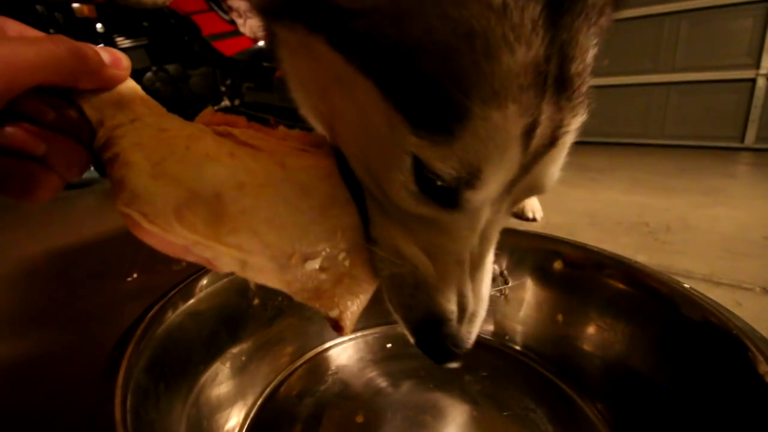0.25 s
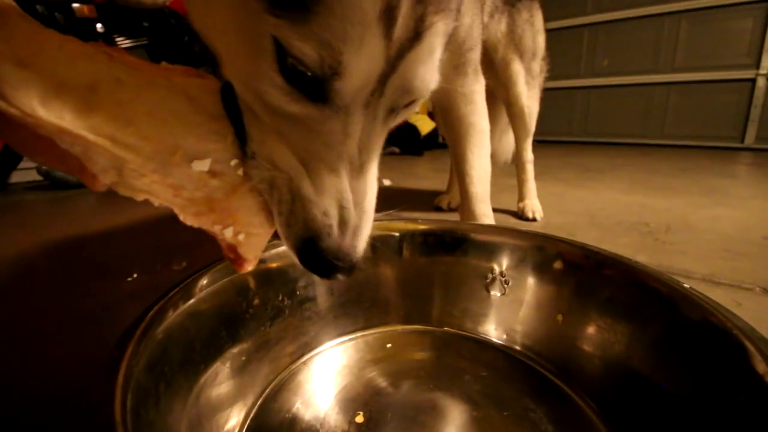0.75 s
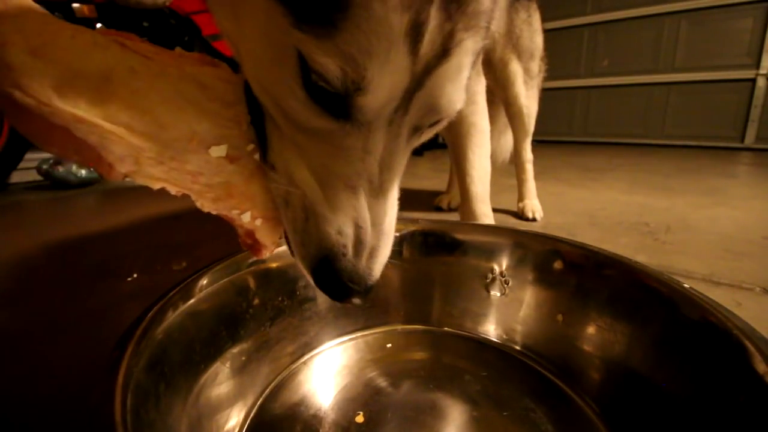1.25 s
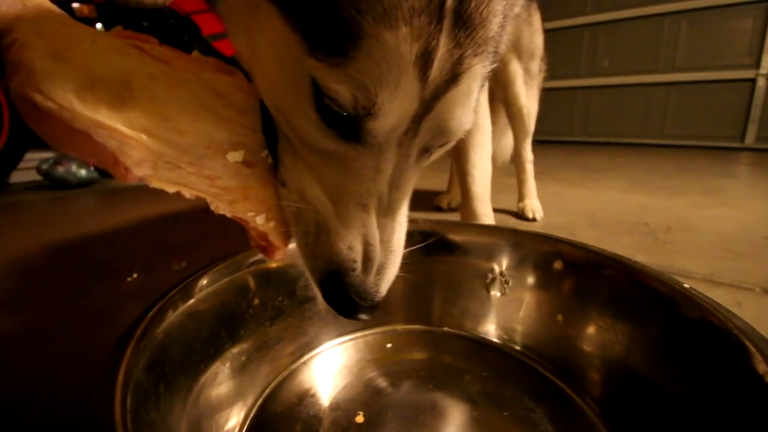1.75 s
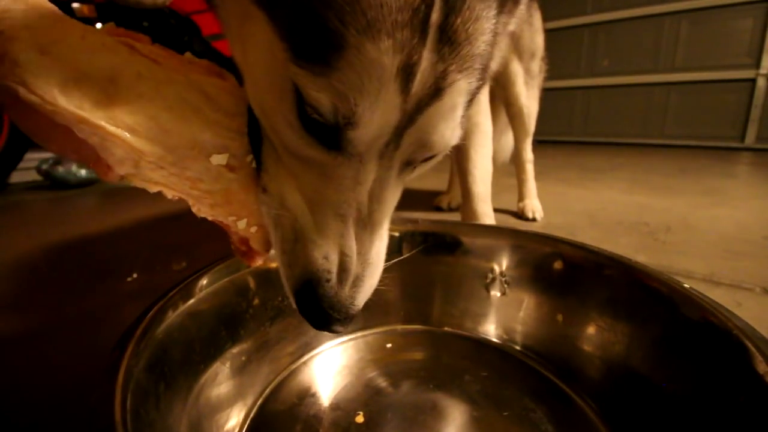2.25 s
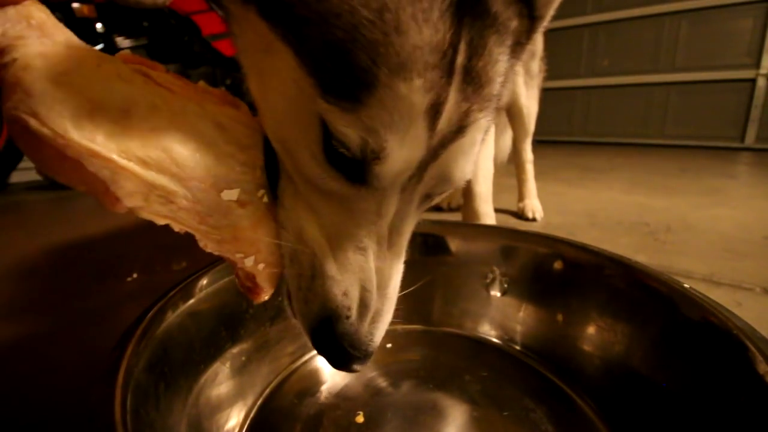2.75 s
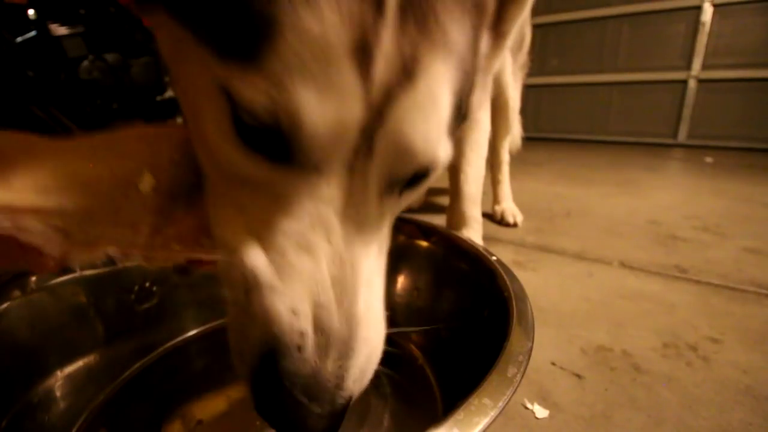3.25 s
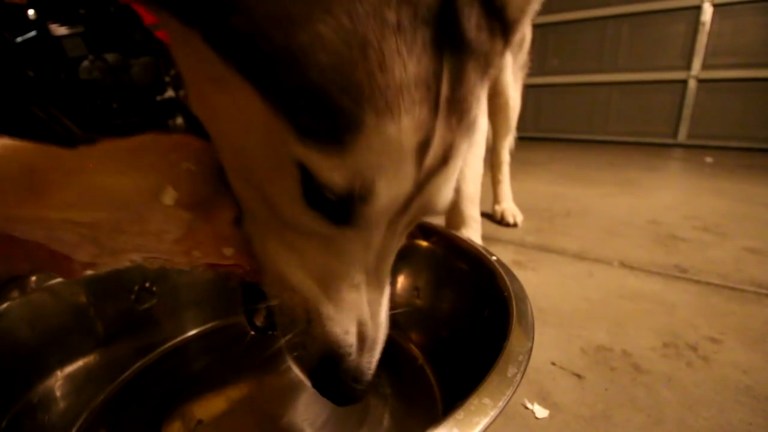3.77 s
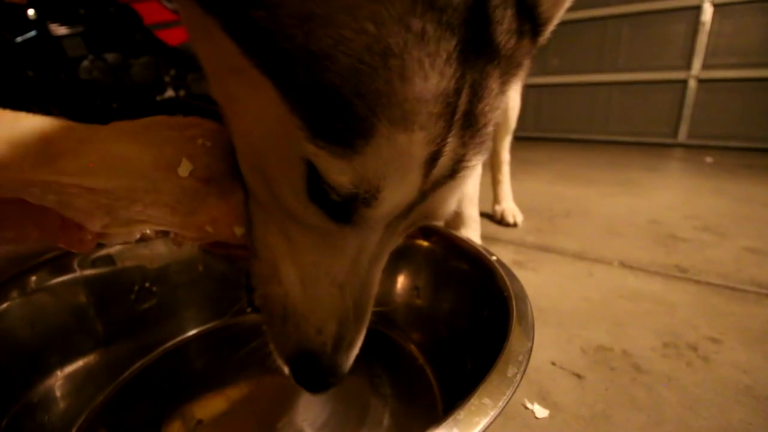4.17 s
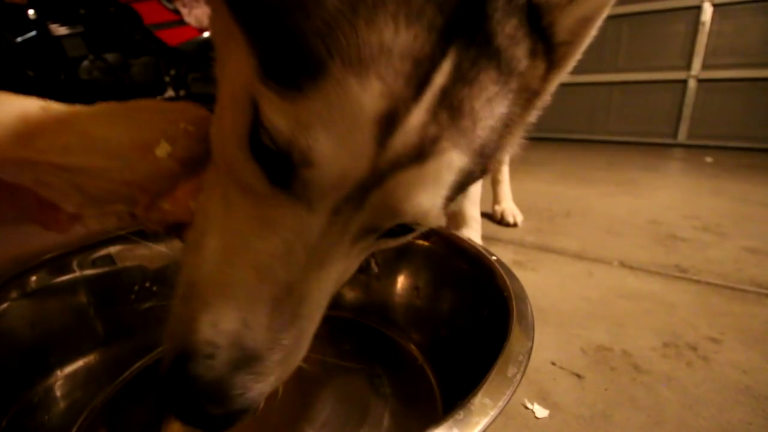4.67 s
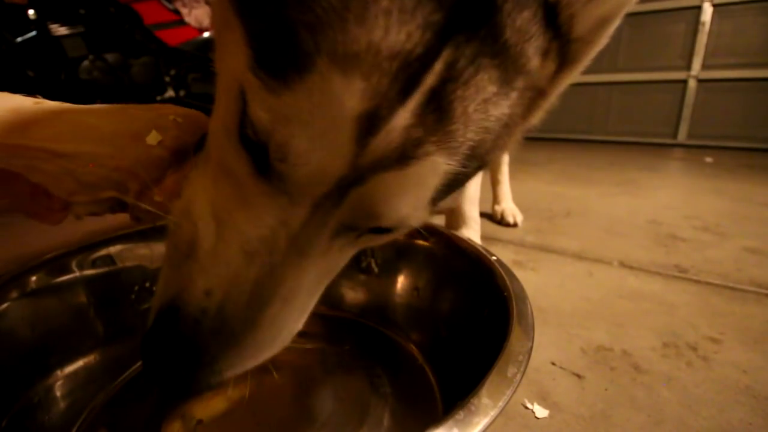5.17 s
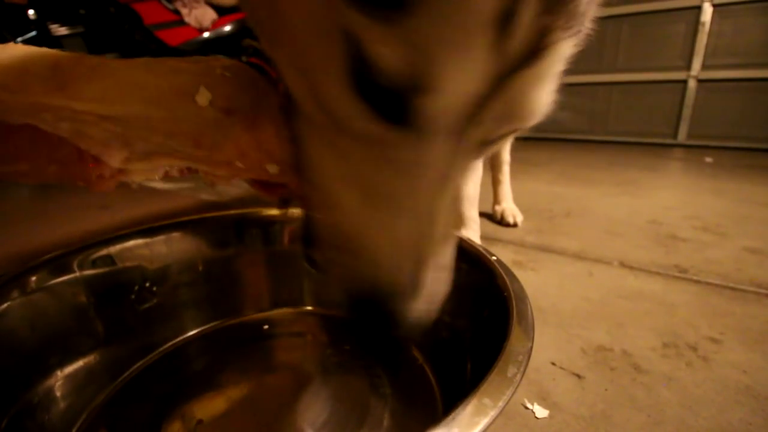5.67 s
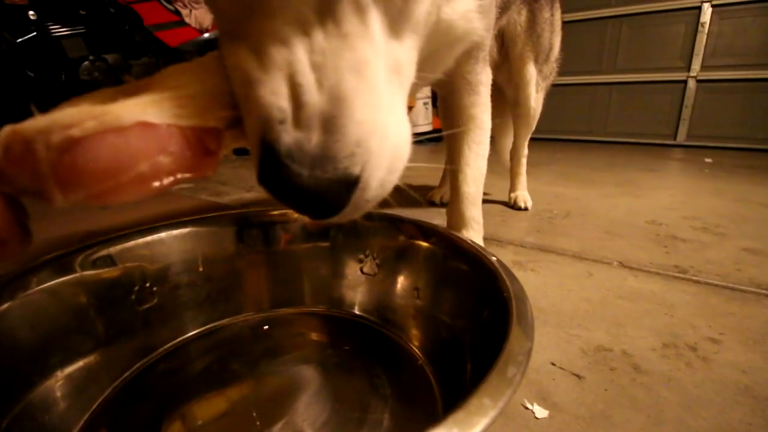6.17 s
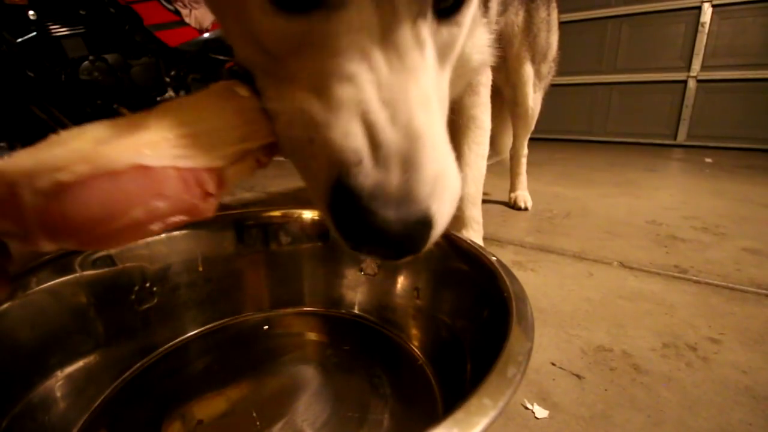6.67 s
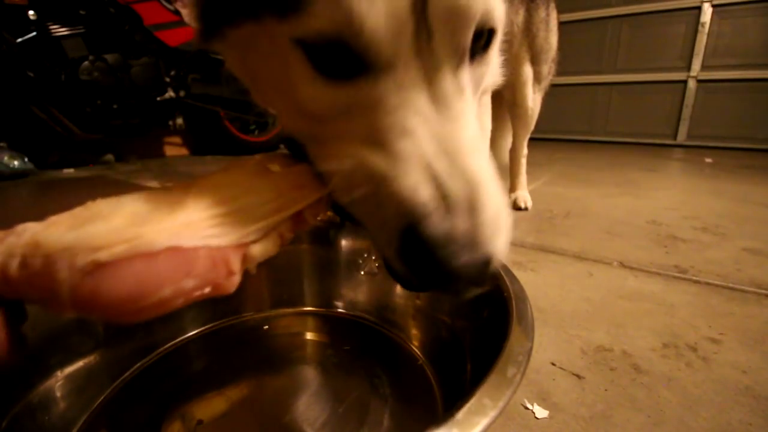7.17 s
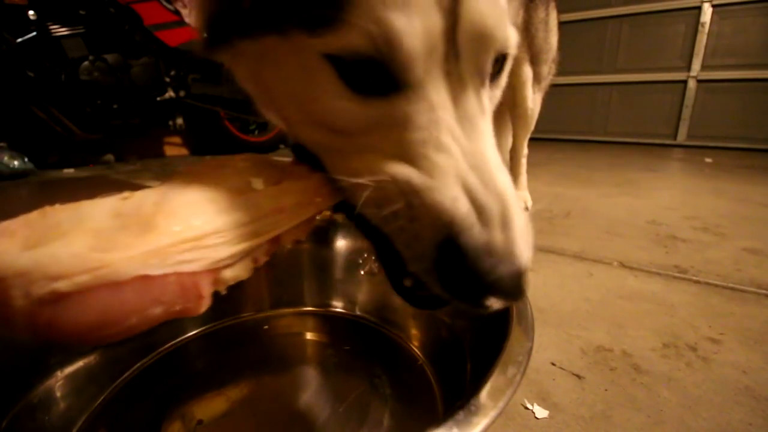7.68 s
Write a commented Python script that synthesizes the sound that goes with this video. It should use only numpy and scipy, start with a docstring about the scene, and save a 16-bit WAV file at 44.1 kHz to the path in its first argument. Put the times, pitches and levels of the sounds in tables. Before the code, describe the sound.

A dog works at raw meat right beside the microphone: sticky squelches, sharp lip smacks, suction pops and low jaw thuds with short meaty cracks, around three irregular chews a second. Early on there are gliding licks. A steel bowl rings very faintly beneath. From three seconds a deep handling rumble joins in, while the quiet garage adds only a thin, dull tail.

```python
"""In a quiet garage, a dog licks and chews raw meat over a wide steel bowl, close to a camera.
Saliva films tear in runs of clicks that ring the mouth as smacks, squelches and suction pops.
Jaws thud and the meat cracks; long licks ring the hollow under the tongue with a gliding pitch.
Decaying modes give the steel and the air in the bowl, fading noise gives the walls' answer,
and filtered noise makes the still air and the rumble of the hand on the camera."""
import sys
import numpy as np
from scipy import signal
from scipy.fft import rfft, irfft
from scipy.io import wavfile
from scipy.ndimage import uniform_filter1d

SR = 44100
rng = np.random.default_rng(int(sys.argv[2]) if len(sys.argv) > 2 else 0)


def transcribe(u):
    """Save the signal u as a 16-bit wav file named by the first command-line argument.

    u: samples, shape (n,) or (channels, n), limited to [-1, 1]; the rate is SR.
    q: integer samples, one column per channel.
    """
    v = np.clip(np.atleast_2d(u).T, -1, 1)
    q = np.round(v * 32767).astype(np.int16)
    wavfile.write(sys.argv[1], SR, q)


N = 349713
TIME = np.arange(N) / SR  # seconds

# colour of wet crackle over the bowl: (frequency [Hz], relative level [dB])
WET = [(90, -9.5), (380, -0.5), (580, -10), (830, -3), (1220, -2.5), (1650, 0), (3800, 4), (4700, -1),
       (5600, 2.5), (7200, -4), (15000, -15.5)]
# colour of the still garage air, shared by the low side noise: (frequency [Hz], relative level [dB])
LOW_COLOUR = [(25, -6), (350, 1), (1200, -15), (3500, -14), (15000, -12.5)]


def undb(db):
    """Decibels to gain."""
    return 10 ** (np.asarray(db) / 20)


def unit(x):
    """Scale to rms 1."""
    return x / np.sqrt(np.mean(x ** 2))


def blow(x, db):
    """Give a short sound the energy of 10 ms at this level."""
    return x * undb(db) * np.sqrt(SR / 100 / np.sum(x ** 2))


def follow(curve):
    """Gain over time from (time [s], level [dB]) rows."""
    return undb(np.interp(TIME, *np.transpose(curve)))


def add(track, s, x):
    """Mix a short sound in at time s."""
    i = int(np.clip(s * SR, 0, N - 1))
    track[i:i + len(x)] += x[:N - i]


def band(x, lo_hz, hi_hz, order=2):
    """Causal band-pass."""
    edges = [lo_hz, min(hi_hz, SR / 2 - 1)]
    return signal.sosfilt(signal.butter(order, edges, "band", fs=SR, output="sos"), x)


def colour(x, points, size=1024):
    """Causal filter with a (frequency [Hz], level [dB]) spectrum, built from the cepstrum."""
    hz, db = np.transpose(points)
    bins = np.maximum(np.arange(size + 1), .5) * SR / (2 * size)
    gain = undb(np.interp(np.log(bins), np.log(hz), db))
    cepstrum = irfft(np.log(gain))[:size]
    cepstrum[1:] *= 2  # folding the cepstrum makes the filter minimum-phase
    response = irfft(np.exp(rfft(cepstrum, 2 * size)))[:size]
    return signal.fftconvolve(x, response)[:len(x)]


def ring(x, hz, t60):
    """One decaying mode driven by x; its pitch may move."""
    turn = np.exp(2j * np.pi * np.cumsum(hz * np.ones(len(x))) / SR)
    decay = np.exp(-np.log(1000) / t60 / SR)
    return (turn * signal.lfilter([1], [1, -decay], x / turn)).imag


def snaps(length, rate, spread_db):
    """Random clicks at a mean rate per second: many small, a few large."""
    hits = rng.random(length) < rate / SR
    sign = rng.choice([-1, 1], length)
    force = undb(spread_db * np.minimum(rng.exponential(size=length), 4))
    return hits * sign * force


def even(x, span_s):
    """Hold the slow level at 1 and keep the quick grain."""
    power = uniform_filter1d(x ** 2, int(span_s * SR))
    return x / np.sqrt(np.maximum(power, 0) + 1e-12)


def tear(ms, first_snap, size):
    """A saliva film parts in snaps that swell and die away; shorter films get a stronger first snap."""
    age = TIME[:size] * 1000 / max(ms, .5)  # in tear lengths
    envelope = np.exp(-age ** 2 / 2) * np.minimum(.45 + 1.5 * age, 1)
    burst = blow(snaps(size, 7000, 2.2) * envelope + 1e-12, 0)
    burst[0] += first_snap * np.linalg.norm(burst) * np.exp(-ms / 2)
    return burst


def pockets(burst, t60, high_hz, count, low_hz=900):
    """Gaps between lips, teeth and meat ring at pitches that are new every time."""
    pitches = low_hz * (high_hz / low_hz) ** rng.random(count)
    return sum(ring(burst, hz, t60) for hz in pitches)


def garage_air():
    """The still air is steady noise, strongest in the lows."""
    return undb(-59.5) * unit(colour(rng.standard_normal(N), LOW_COLOUR))


def side_noise():
    """A faint hiss and a very quiet low noise, later heard in opposite phase at the two ears."""
    hiss = undb(-67.5) * unit(band(rng.standard_normal(N), 9500, 13000, order=1))
    low_noise = undb(-69.5) * unit(colour(rng.standard_normal(N), LOW_COLOUR))
    return hiss + low_noise


def handling(swell_db=1.5, size=8000):
    """The hand on the camera: a deep flutter over an unevenly swelling rumble, and a few soft bumps."""
    # flutter and rumble together: (time [s], level [dB])
    hand_level = [(2.93, -59), (3.0, -46), (5.7, -51), (6.0, -47), (7.9, -51.5)]
    # soft low bumps: (time [s], level over 10 ms [dB])
    bump_table = [(0.966, -40), (5.445, -42), (6.07, -39)]
    flutter = unit(band(rng.standard_normal(N), 24.8, 27.7))
    swell = undb(swell_db * unit(band(rng.standard_normal(N), 0.42, 4.4)))
    rumble = unit(band(rng.standard_normal(N), 6.4, 73, order=1) * swell)
    out = unit(flutter + rumble) * follow(hand_level)
    for s, db in bump_table:
        add(out, s, blow(band(tear(14.3, 0, size), 55, 104), db))
    return out


def chewing():
    """How hard the mouth works, as a gain: each chew is a tongue stroke that ends in a squeeze."""
    # about three chews a second: (start [s], tongue level at the start [dB],
    # length until the mouth closes [s], squeeze level at the closing [dB])
    chew_table = [(0, -45, 0.12, -35), (0.237, -37, 0.17, -43.5), (0.497, -41, 0.21, -40.5),
                  (0.863, -39.5, 0.25, -32), (1.377, -35, 0.25, -29.5), (1.926, -35, 0.26, -37),
                  (2.447, -38, 0.26, -35.5), (2.914, -35, 0.23, -43.5), (3.196, -42, 0.17, -30.5),
                  (3.549, -30, 0.024, -38), (3.715, -39, 0.21, -34.5), (4.16, -34.5, 0.034, -47.5),
                  (4.319, -38, 0.065, -47), (4.451, -40.5, 0.11, -50.5), (4.633, -38, 0.052, -40.5),
                  (4.8, -44.5, 0.21, -42), (5.078, -33, 0.13, -31.5), (5.531, -46, 0.17, -39),
                  (5.935, -39.5, 0.23, -31.5), (6.27, -38.5, 0.097, -42), (6.534, -34, 0.23, -32.5),
                  (6.86, -45, 0.15, -44), (7.054, -39, 0.17, -29), (7.381, -43, 0.15, -38),
                  (7.726, -35.5, 0.13, -33.5)]
    open_s, slack_db_per_s = 0.033, 27.5  # the tongue takes hold quickly, then eases off
    squeeze_db_per_s, release_db_per_s = 233, 111  # swell up to the closing, fall after it
    rest_db = -58  # saliva still crackles faintly between chews
    power = np.full(N, undb(rest_db) ** 2)
    for start, tongue_db, length, squeeze_db in chew_table:
        age = np.maximum(TIME - start, 0)
        before, after = np.maximum(length - age, 0), np.maximum(age - length, 0)
        opened = np.clip((TIME - start) / open_s + .5, 0, 1)
        stroke = np.clip(before / open_s, 0, 1) * undb(tongue_db - slack_db_per_s * age)
        squeeze = undb(squeeze_db - squeeze_db_per_s * before - release_db_per_s * after)
        power += opened ** 2 * (stroke ** 2 + squeeze ** 2)
    return np.sqrt(power)


def squelches(spread_db=3.0, count=1500, size=1400):
    """Many small soft tears, each a few milliseconds long, ring pockets of their own pitches."""
    out, t60 = np.zeros(N), .009
    for when, length, force, life in rng.random((count, 4)):
        burst = tear(.5 + 5 * length, .4, size)
        gaps = pockets(burst, t60 * (.5 + life), high_hz=5800, count=2)
        wet = blow(gaps, 0) + blow(burst, -1)
        force_db = -spread_db * np.log(1 - .98 * force)  # few are strong
        add(out, when * N / SR, wet * undb(force_db))
    return colour(out, WET)


def tongue(effort, squelch_db=-4, tick_db=-16):
    """Tongue and meat stick and part: squelches and tiny pitched saliva ticks over a fine wet smear."""
    smear = undb(-15) * unit(colour(snaps(N, 1200, 4), WET))
    ticks = sum(ring(snaps(N, 25, 8), hz, .0012) for hz in np.geomspace(4800, 12500, 7))
    wet = even(undb(squelch_db) * unit(squelches()) + smear, .09)
    return (wet + undb(tick_db) * unit(ticks)) * effort


def smack(db, hz, ms, cavity_db=-3, pocket_db=-6, spray_db=-1.5, flesh_db=-17, size=2600):
    """A tear rings the mouth cavity; quick snaps spray over a wide band, long squeezes over a narrower one."""
    t60 = .019
    burst = tear(ms, 1.0, size)
    focus = np.clip(ms / 7, 0, 1)  # 0 quick snap, 1 long squeeze
    low_hz, high_hz = 850 + 0.37 * focus * hz, 4300 + hz * (1 - 0.535 * focus)
    cavity = blow(band(ring(burst, hz, t60), hz / 2, 2 * hz), db + cavity_db)
    gaps = pockets(burst, t60, high_hz, count=5, low_hz=low_hz)
    gaps = blow(band(gaps, low_hz, high_hz), db + pocket_db)
    spray_top_hz = high_hz * (1 + 1 / max(ms, .5))
    spray = blow(band(colour(burst, WET), low_hz, spray_top_hz), db + spray_db)
    flesh = blow(band(burst, 156, 550), db + flesh_db)
    return cavity + gaps + spray + flesh


def smacks():
    """Lips and tongue come away from the meat with single smacks."""
    # (time [s], base level of the parts over 10 ms [dB], cavity pitch [Hz], tear length [ms])
    smack_table = [(.004, -32, 2200, 5.5), (.117, -27.5, 5620, 17), (0.16, -20, 4210, 12.3),
                   (0.648, -34.5, 1480, 5.3), (0.711, -37.5, 2580, 2.6), (0.978, -29.5, 1160, 1.7),
                   (1.06, -33.5, 3500, 4), (1.16, -27, 3540, 4.8), (1.226, -42, 940, 2.3),
                   (1.381, -30.5, 1000, 5.7), (1.431, -30, 1160, 5.4), (1.52, -31, 5050, 3.2),
                   (1.616, -29, 1120, 4.7), (1.672, -24, 1070, 14.4), (1.7054, -25, 3810, 2.7),
                   (1.762, -39.5, 2560, 3.5), (1.94, -28, 1130, 2.9), (2.043, -32.5, 1427, 1.7),
                   (2.565, -32.5, 1530, 0.67), (2.624, -31.5, 6040, 2.5), (2.921, -35.5, 1760, 11),
                   (2.9916, -32.5, 5800, 9.2), (3.06, -26.5, 3000, 6.1), (3.156, -39.5, 2760, 3.5),
                   (3.624, -40, 3350, 3.1), (3.736, -33, 3390, 5.2), (3.9384, -26, 3960, 3.3),
                   (3.984, -28.5, 1660, 3.1), (4.255, -37.5, 3480, 2.4), (4.326, -40.5, 3380, 3.6),
                   (4.421, -43.5, 955, 1.5), (4.462, -36.5, 3470, 3.8), (4.6091, -38, 1950, 0.46),
                   (4.661, -33.5, 3570, 3.8), (4.731, -39.5, 2450, 2.9), (4.954, -33, 2380, 6.9),
                   (5.097, -26.5, 3470, 9.2), (5.165, -32.5, 2120, 5.3), (5.2028, -25.5, 2600, 1.4),
                   (5.2117, -24.5, 3280, 1), (5.7, -33, 5850, 8.3), (6.058, -23, 3090, 3.75),
                   (6.085, -27, 1144, 4.6), (6.277, -33.5, 4040, 3.9), (6.373, -37, 3360, 3.6),
                   (6.389, -37, 2120, 0.76), (6.554, -29, 1210, 5.2), (6.659, -25.5, 2910, 2.5),
                   (6.771, -34, 1490, 2.6), (6.869, -34, 2580, 6.7), (7.28, -22.5, 2520, 22),
                   (7.3116, -23, 4040, 3.4), (7.323, -24, 3630, 3.3), (7.653, -31, 4670, 3),
                   (7.797, -24.5, 1550, 1.5), (7.893, -29, 3040, 5.5)]
    out = np.zeros(N)
    for s, db, hz, ms in smack_table:
        add(out, s, smack(db, hz, ms))
    return out


def bowl(x, ring_db=-23):
    """The steel rings in sympathy with the mouth just above it."""
    # modes of the steel: (frequency [Hz], relative level [dB], t60 [s])
    bowl_modes = [(271, -10, .22), (1174, -3, .15), (1307, -3, .15), (2963, -5, .1), (3795, -5, .06),
                  (5499, -7, .2)]
    knock = np.eye(1, SR // 2)[0]  # one single click
    response = sum(undb(db) * unit(ring(knock, hz, t60)) for hz, db, t60 in bowl_modes)
    return undb(ring_db) * signal.fftconvolve(x, response / np.linalg.norm(response))[:N]


def bowl_air(x, t60=0.05):
    """With the muzzle down in the bowl, the air in it adds hollow notes."""
    # resonances of the hollow: frequency [Hz]
    hollow_hz = [838, 1216, 1804]
    # how strongly the lowered muzzle drives them: (time [s], drive before halving [dB])
    muzzle_drive = [(2.7, -17), (3.0, -14), (5.2, -10), (5.6, -21)]
    knock = np.eye(1, SR // 2)[0]
    response = np.diff(sum(ring(knock, hz, t60) for hz in hollow_hz))  # thins the lows
    return signal.fftconvolve(x * follow(muzzle_drive), response / np.linalg.norm(response) / 2)[:N]


def garage(x, t60=0.76, room_db=-24):
    """Floor and walls return a thin, dull tail of fading noise."""
    t = TIME[:SR // 2]
    tail = band(rng.standard_normal(len(t)), 100, 3100, order=1) * undb(-60 * t / t60)
    return undb(room_db) * signal.fftconvolve(x, tail / np.linalg.norm(tail))[:N]


def pops(rise_per_s=1.8, spray_db=-1.5, size=2600):
    """The tongue breaks its seal and the opening cavity rings with a rising note and a wet spray."""
    # (time [s], base level of the parts over 10 ms [dB], first cavity pitch [Hz], tear length [ms])
    pop_table = [(0.1443, -28.5, 1970, 1.3), (0.917, -37.5, 1070, 3.4), (1.145, -29.5, 840, 5.4),
                 (3.0758, -20, 1614, 2.7), (3.443, -25.5, 850, 11.5), (4.0, -30, 1610, 4.4),
                 (4.172, -34.5, 1880, 2.8), (5.009, -34.5, 1200, 3.4), (5.6813, -29.5, 1540, 1.65),
                 (6.173, -22.5, 3500, 4.2), (7.374, -20.5, 3600, 5.5), (7.6063, -29, 880, 1.9)]
    out, t60 = np.zeros(N), .012
    for s, db, hz, ms in pop_table:
        burst = tear(ms, 0.2, size)
        rising_hz = hz * (1 + rise_per_s * TIME[:size])
        note = band(ring(burst, rising_hz, t60), 1.0 * hz, 2 * hz)
        spray = band(colour(burst, WET), max(hz / 2, 850), 4700)
        add(out, s, blow(note, db - 1) + blow(spray, db + spray_db))
    return out


def bites(size=2600):
    """Closing jaws give a dull thud, and the meat a fading run of tears, each with a short bright crack."""
    # (time [s], base level of the first tear [dB], its cavity pitch [Hz], tear length [ms],
    # tears [count], thud level [dB], first crack level [dB]); levels over 10 ms
    bite_table = [(0.522, -46, 1320, 3.2, 1, -39, -37), (1.129, -24.5, 2980, 4, 1, -37, -40),
                  (1.528, -19, 1380, 5.3, 3, -36.5, -32), (2.168, -18, 1197, 3.4, 1, -35.5, -36),
                  (2.6433, -25, 3020, 2.9, 3, -26.5, -26.5), (3.3781, -21, 3620, 1.7, 3, -30.5, -59),
                  (3.895, -18.5, 1890, 2.5, 1, -38, -39), (5.181, -23, 1270, 2.8, 2, -35.5, -38),
                  (5.2462, -29, 3100, 2.4, 2, -46, -53), (6.1914, -23, 1370, 3, 1, -34.5, -70),
                  (6.711, -17, 1430, 1.3, 1, -25.5, -30), (6.726, -19.5, 1630, 3.2, 4, -28, -42),
                  (7.23, -19.5, 1410, 2.9, 1, -63, -25.5), (7.767, -19.5, 1950, 2, 1, -47, -30.5),
                  (7.802, -18, 1560, 2.65, 1, -33.5, -35)]
    # further tears of a bite follow closely, weaker, and higher as the mouth gets smaller
    gap_s, fade_db, rise = .0072, 1.9, 1.1  # rise is a pitch ratio
    out = np.zeros(N)
    for s, db, hz, ms, tears, thud_db, crack_db in bite_table:
        add(out, s, blow(band(tear(5.2, 3.6, size), 115, 475), thud_db))
        for k in range(round(tears)):
            crack = blow(band(tear(ms, 1, size), 3900, 14800), crack_db)
            wet_tear = smack(db, hz * rise ** k, ms)
            add(out, s + k * gap_s, (wet_tear + crack) * undb(-k * fade_db))
    return out


def licks(size=12000):
    """Crackle rings the hollow under the tongue, whose pitch glides as the tongue moves."""
    # (time [s], level [dB], length [s], first pitch [Hz], last pitch [Hz])
    lick_table = [(0.852, -45, 0.11, 900, 1140), (1.374, -43.5, 0.14, 900, 1450),
                  (1.571, -49, 0.11, 1220, 990), (1.924, -47.5, 0.19, 1010, 1430),
                  (2.454, -45, 0.11, 1010, 1310), (7.059, -44, 0.18, 1120, 1370)]
    out = np.zeros(N)
    for s, db, length_s, start_hz, end_hz in lick_table:
        stroke = np.linspace(0, 1, min(int(length_s * SR), size))
        glide_hz = start_hz + (end_hz - start_hz) * stroke
        hollow = even(ring(snaps(len(stroke), 600, 3), glide_hz, .02), .05)
        swell = np.sqrt(np.abs(np.sin(np.pi * np.sqrt(stroke))))
        add(out, s, undb(db) * unit(band(hollow, 990, 2 * end_hz, order=3) * swell))
    return out


def scene():
    """All sound sits in the centre, save a faint hiss and a very quiet low noise that differ between the ears."""
    mouth = tongue(chewing()) + smacks() + pops() + bites() + licks()
    centre = garage_air() + handling() + mouth + bowl(mouth) + bowl_air(mouth) + garage(mouth)
    side = side_noise()
    return np.array([centre + side, centre - side])


def record(dry):
    """The camera clips at full scale and cuts the top with a steep low-pass."""
    top_hz = 15900
    low_pass = signal.ellip(8, .2, 70, top_hz, fs=SR, output="sos")
    return signal.sosfilt(low_pass, np.clip(dry, -1, 1))


dry = scene()
out = record(dry)
transcribe(out)
```